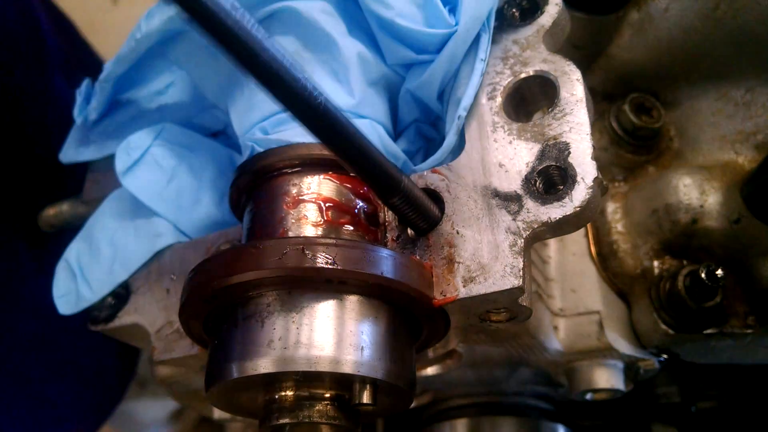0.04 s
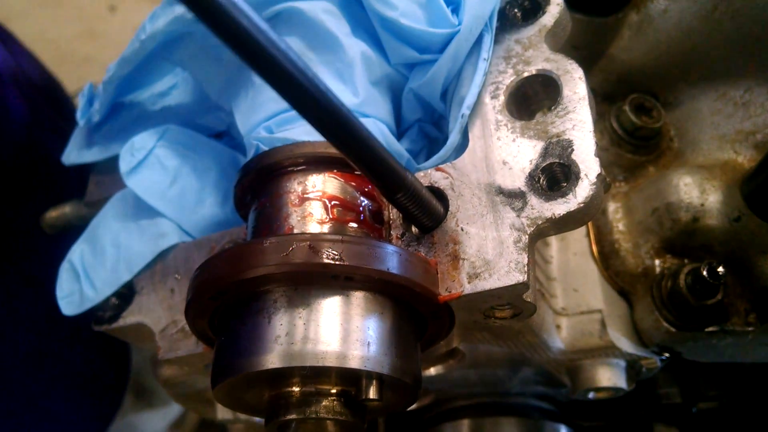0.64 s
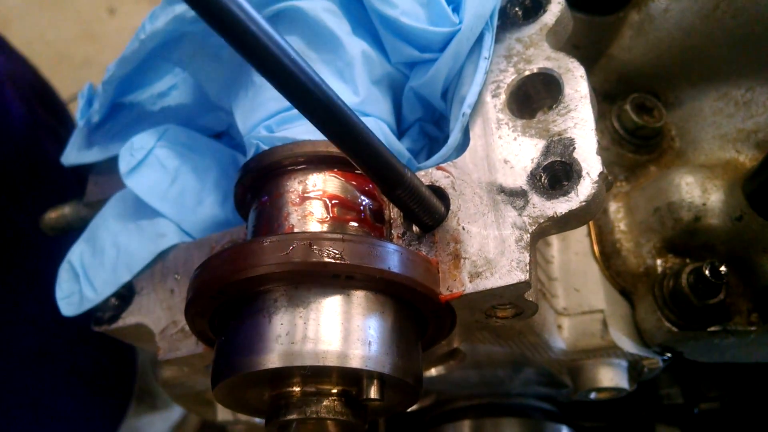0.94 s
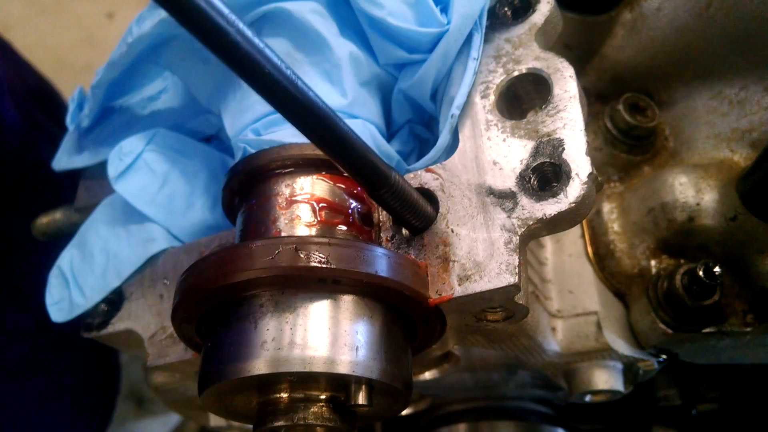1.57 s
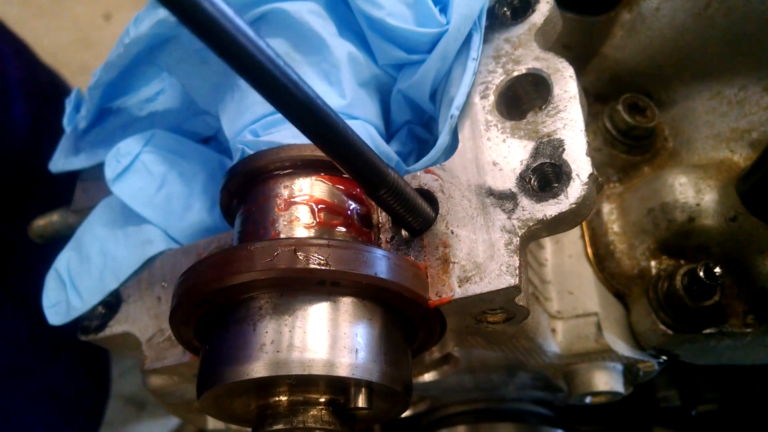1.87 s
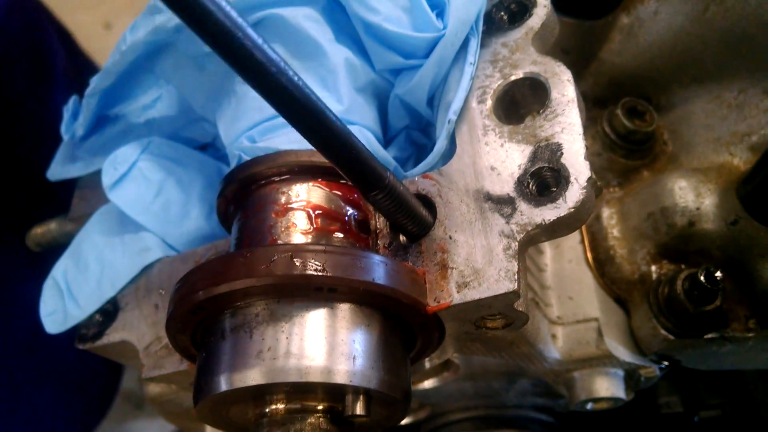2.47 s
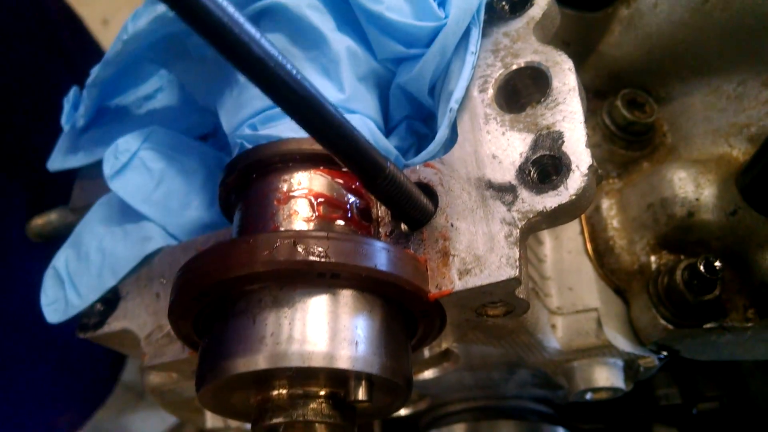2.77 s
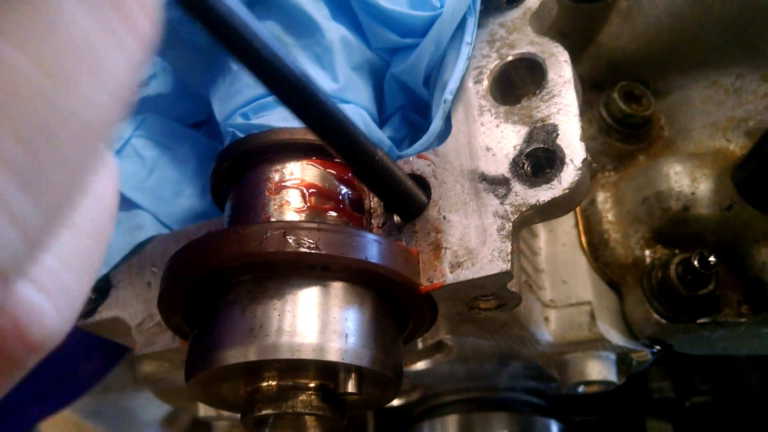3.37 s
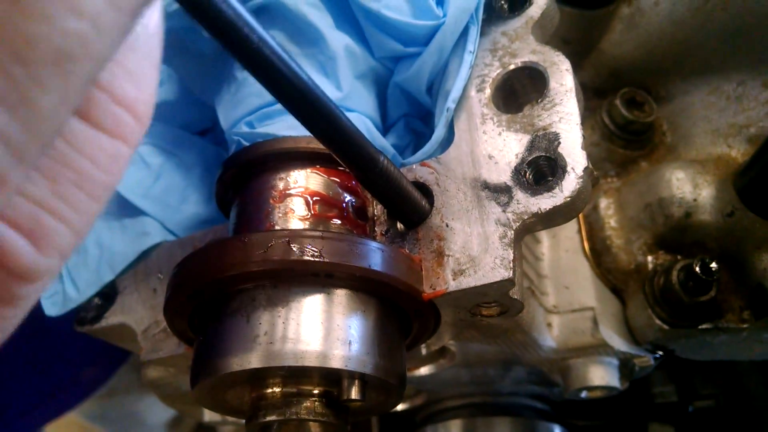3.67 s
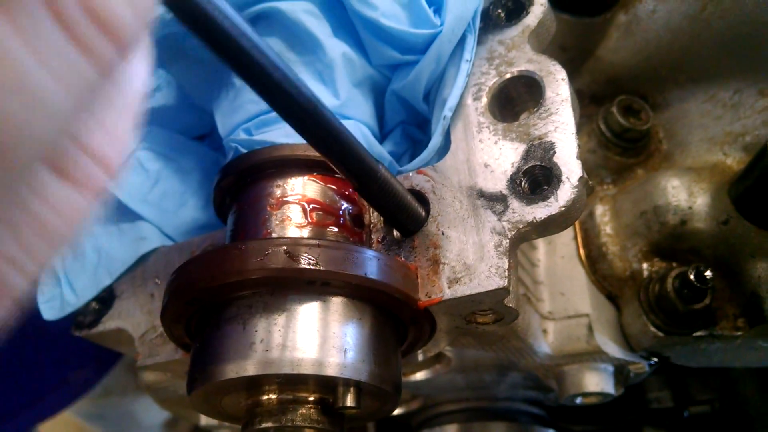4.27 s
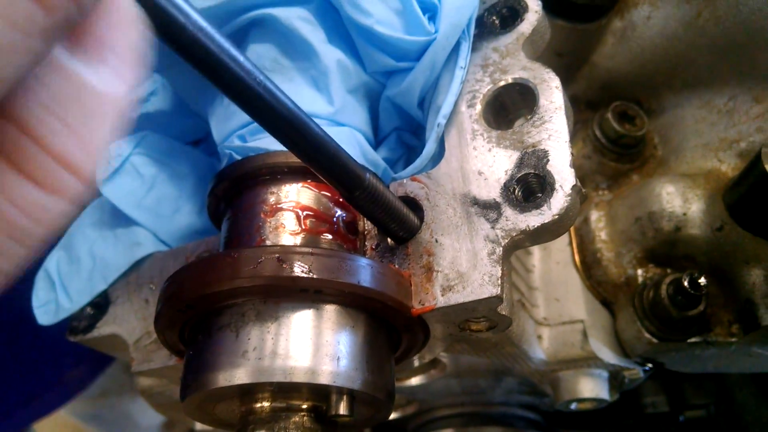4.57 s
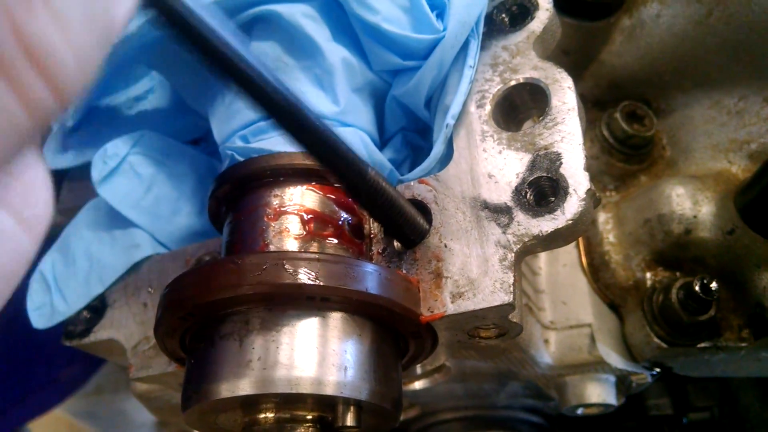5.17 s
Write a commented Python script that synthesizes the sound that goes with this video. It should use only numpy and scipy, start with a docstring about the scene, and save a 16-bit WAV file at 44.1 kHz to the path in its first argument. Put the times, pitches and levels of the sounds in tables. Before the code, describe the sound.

A long steel tool is spun by hand in a threaded hole of an engine part. Its shaft knocks against the metal in light, bright clicks, singly or in quick clusters, each with a very short ring. Faint rubbing, scraping and thin squeaks come with each twist, and the sharpest click falls near the end. The sound is close and nearly dry, with a few soft finger bumps on the microphone and a low workshop hum behind.

```python
"""A long steel tool, spun by hand in a threaded hole of an engine part, close to a camera's microphone.
The shaft knocks against the hole in light, bright clicks that ring the tip, the shaft and the casting;
with each twist of the fingers it rubs, scrapes and faintly squeaks. Fingers bump the camera now and then,
and farther off the workshop hums. The recorder ducks after the hardest click and widens the stereo."""
import sys
import numpy as np
from scipy import signal
from scipy.fft import rfft, irfft
from scipy.io import wavfile
from scipy.ndimage import uniform_filter1d, minimum_filter1d

SR = 44100
rng = np.random.default_rng(int(sys.argv[2]) if len(sys.argv) > 2 else 0)


def store_pcm(level_fs):
    """Save levels as 16-bit WAV."""
    pcm = np.round(np.clip(level_fs, -1, 1) * 32767).astype(np.int16)
    wavfile.write(sys.argv[1], SR, np.atleast_2d(pcm).T)


N = 234567
FILTER_HZ = np.fft.rfftfreq(2048, 1 / SR)


def amp(db):
    """Decibels to gain."""
    return 10 ** (np.asarray(db) / 20)


def unit_rms(x):
    """Scales to rms 1."""
    return x / np.sqrt(np.mean(x ** 2) + 1e-30)


def unit_burst(x, over_s=.0056):
    """Scales a short stereo sound to the energy of rms 1 held for over_s."""
    return x / np.sqrt(np.sum(x ** 2) / (2 * over_s * SR) + 1e-30)


def at_hz(points, hz):
    """Reads a spectrum on a log-frequency axis."""
    f, value = np.transpose(points)
    return np.interp(np.log(hz + 1), np.log(f + 1), value)


def curve(rows, column):
    """One column of a timed table at every sample."""
    rows = np.asarray(rows)
    return np.interp(np.arange(N) / SR, rows[:, 0], rows[:, column])


def with_peaks(points, modes):
    """A spectrum plus narrow resonances, in dB at FILTER_HZ."""
    peaks_db = sum(db / (1 + (2 * (FILTER_HZ - f) / width) ** 2) for f, width, db in modes)
    return at_hz(points, FILTER_HZ) + peaks_db


def bell(centre_hz, hz, octaves):
    """A bell of height 1 on a log-frequency axis."""
    return np.exp(-(np.log2((hz + 1) / centre_hz) / octaves) ** 2)


def response(points):
    """Causal impulse response with the given spectrum."""
    log_gain = np.log(amp(at_hz(points, abs(np.fft.fftfreq(2048, 1 / SR)))))
    return np.fft.ifft(np.exp(np.conj(signal.hilbert(log_gain)))).real[:1024]


def through(x, taps):
    """Filters both channels."""
    return signal.fftconvolve(x, taps[None], axes=1)[:, :x.shape[1]]


def add(mix, s, sound):
    """Mixes a sound in at time s."""
    part = mix[:, max(0, round(s * SR)):][:, :sound.shape[1]]
    part += sound[:, :part.shape[1]]


def wander(hz):
    """Random drift of rms 1, up to the given rate."""
    f = np.fft.rfftfreq(N, 1 / SR)
    return unit_rms(irfft(rfft(rng.standard_normal(N)) / (1 + (f / hz) ** 4), N))


def pan(left_db):
    """Gains that favour the left channel."""
    return amp([[left_db / 2], [-left_db / 2]])


def port_noise(n, likeness):
    """Noise at the two microphone ports, partly shared."""
    shared = np.sqrt(likeness) * rng.standard_normal(n)
    return shared + np.sqrt(1 - likeness) * rng.standard_normal((2, n))


# workshop air and microphone hiss: spectrum (f/Hz, level/dB) and course (t/s, level/dB)
AIR_SPECTRUM = [(20, 9), (60, 8), (140, 2), (370, -4), (455, -2), (560, -7), (800, -12.5), (1200, -12),
                (1650, -18), (2000, -14.5), (2300, -19.5), (5000, -18.5), (15400, -22), (15700, -58)]
AIR_LEVEL = [(0, -52), (2.8, -51.5), (3.8, -54.5), (5.3, -54)]
# how alike distant sound is at the two ports (f/Hz, likeness/0-1)
PORT_LIKENESS = [(20, 0.56), (200, 0.57), (500, 0.49), (1200, 0.32), (2200, 0), (16000, 0.07)]
# machinery in the background, stepping up in pitch once (t/s, f/Hz, level/dB)
MACHINE_HUM = [(0, 81, -54), (3.85, 81.5, -56), (4.1, 96, -54), (4.7, 96, -51.5), (5.3, 96.3, -48)]


def workshop(drift_hz=0.54, waver_db=3.5, overtone_db=-12):
    """Behind the work: room noise, microphone hiss and, to the left, a wavering machine hum."""
    hz = np.fft.rfftfreq(N, 1 / SR)
    left, apart = rfft(rng.standard_normal((2, N)))
    likeness = at_hz(PORT_LIKENESS, hz)
    right = likeness * left + np.sqrt(1 - likeness ** 2) * apart
    air = unit_rms(irfft(np.array([left, right]) * amp(at_hz(AIR_SPECTRUM, hz)), N))
    phase = 2 * np.pi * np.cumsum(curve(MACHINE_HUM, column=1) + drift_hz * wander(hz=4.1)) / SR
    hum = np.sin(phase) + amp(overtone_db) * np.sin(2 * phase)
    hum *= amp(curve(MACHINE_HUM, column=2) + waver_db * wander(hz=15))
    return air * amp(curve(AIR_LEVEL, column=1)) * pan(left_db=1.5) + hum * np.array([[1], [.25]])


def room_tail(x, low_t60=0.65, high_t60=0.065, treble_db=-31):
    """The workshop returns a diffuse tail, shorter and weaker in the treble."""
    t = np.arange(SR // 3) / SR
    noise = rng.standard_normal((2, len(t))) * np.minimum(t / 0.01, 1)
    low = signal.sosfilt(signal.butter(2, 2800, fs=SR, output="sos"), noise)
    tail = low * amp(-60 * t / low_t60) + noise * amp(treble_db - 60 * t / high_t60)
    return signal.fftconvolve(x, tail / np.linalg.norm(tail[0]), axes=1)[:, :N]


# handling noise, right at the microphone (t/s, peak level/dB, f/Hz)
FINGER_BUMPS = [(0.056, -37, 165), (1.241, -22.5, 223), (1.737, -32.5, 86), (1.7683, -34, 324),
                (2.988, -30.5, 60), (3.044, -35.5, 302), (3.067, -32, 165), (3.081, -31.5, 272),
                (3.093, -40, 200), (3.3, -33.5, 80), (3.586, -36, 73.6), (3.7, -29, 290),
                (3.958, -26.5, 71), (4.351, -29, 76.4), (5.103, -30.5, 78)]


def finger_bumps(width_cycles=0.37, right_share=0.013):
    """A finger pushes the camera body and lets go: one soft swing, mostly at the left port."""
    out, t = np.zeros((2, N)), np.arange(-SR // 25, SR // 25) / SR
    for start, db, hz in FINGER_BUMPS:
        u = t * hz / width_cycles
        swing = -2 * u * np.exp(.5 - 2 * u ** 2)
        add(out, start + t[0], amp(db) * swing * np.array([[1], [right_share]]))
    return out


# twists of the fingers (t/s, length/s, hiss level/dB, squeak level/dB, grind level/dB)
FINGER_TWISTS = [(0.01, 0.19, -51, -56, -55.5), (0.449, 0.16, -57.5, -65, -61), (0.563, 0.3, -56, -62, -72),
                 (0.624, 0.14, -80, -57, -80), (0.823, 0.094, -82, -75, -59.5),
                 (1.006, 0.048, -53.5, -67, -56.5), (1.177, 0.14, -49.5, -56, -52.5),
                 (1.29, 0.066, -58, -67, -76), (1.727, 0.15, -50, -57, -56.5),
                 (1.927, 0.083, -85, -77, -55.5), (2.238, 0.22, -51, -56, -60.5),
                 (2.507, 0.41, -68, -73, -67), (2.998, 0.2, -52, -64, -58.5), (3.331, 0.1, -43, -57, -46.5),
                 (3.425, 0.052, -51.5, -61, -58), (3.538, 0.072, -62, -76, -55.5),
                 (3.608, 0.21, -46.5, -59, -61), (3.946, 0.08, -59, -64, -71),
                 (3.992, 0.094, -45, -53, -69), (4.16, 0.028, -53.5, -62, -63),
                 (4.182, 0.052, -63, -58, -64), (4.217, 0.13, -60.5, -62, -80),
                 (4.356, 0.2, -50, -56, -54.5), (4.67, 0.18, -61, -68, -68), (4.954, 0.075, -62, -66, -88),
                 (5.12, 0.2, -52.5, -67, -55.5)]


def twist_gains(resting_db=(-63.5, -77, -84.5), peak_share=0.35, sharpness=1.32):
    """Gains of hiss, squeak and grind: in each twist the pressure swells and eases in one arch."""
    gains = amp(resting_db)[:, None] * np.ones(N)
    for start, length, *levels_db in FINGER_TWISTS:
        progress = np.arange(0, length, 1 / SR) / length
        swell = np.interp(progress, [0, peak_share, 1], [0, 1, 0])
        add(gains, start, amp(levels_db)[:, None] * np.sin(np.pi / 2 * swell) ** sharpness)
    return gains


def friction(spectrum, slips_per_s, grit, likeness):
    """Tiny slips of uneven size over a smooth slide, coloured by what they shake."""
    slips = (rng.random(N) < slips_per_s / SR) * amp(4 * np.minimum(rng.exponential(1, N), 3))
    drive = port_noise(N, likeness) * (1 + grit * unit_rms(slips))
    return unit_rms(through(drive, response(spectrum)))


# three colours of steel rubbing in the thread, heard close (f/Hz, level/dB)
HISS_SPECTRUM = [(1000, -38), (3000, -1), (4600, -1), (6500, 1), (9000, 3), (11000, 5), (12800, 8),
                 (14800, 5.5), (15450, 16), (15700, -30)]
SQUEAK_SPECTRUM = [(12000, -21), (13300, 27), (13750, 23), (14050, 37), (14400, 7), (14750, 15),
                   (15200, -9)]
GRIND_SPECTRUM = [(100, 10.5), (300, 5.5), (560, 1), (720, 3), (930, -4.5), (1300, 0.5), (1700, -1.5),
                  (2030, 7), (2300, -16), (2750, 0), (3100, -2.5), (5000, -25.5)]
# shaft resonances that sliding excites (f/Hz, width/Hz, level over the hiss/dB)
SLIDING_MODES = [(2980, 44, 7), (5680, 120, 10.5), (7320, 330, 11), (12050, 110, 8)]


def shaft_rubbing(flutter_db=-1.5, catch_db=3, tremble_db=1.5):
    """Close by, a little left, the turning shaft slides, squeaks and grinds under a trembling pressure."""
    sliding, squeaking, grinding = twist_gains()
    hiss_colour = np.c_[FILTER_HZ, with_peaks(HISS_SPECTRUM, SLIDING_MODES)]
    hiss = sliding * friction(hiss_colour, slips_per_s=1800, grit=0.4, likeness=0.05)
    squeak = amp(3) * squeaking * friction(SQUEAK_SPECTRUM, slips_per_s=2540, grit=0.44, likeness=0.11)
    grind = grinding * friction(GRIND_SPECTRUM, slips_per_s=800, grit=.6, likeness=.35)
    squeak *= amp(flutter_db * wander(hz=42))
    grind *= amp(catch_db * wander(hz=35))  # the thread catches and slips
    return (hiss + squeak + grind) * amp(tremble_db * wander(hz=77)) * pan(left_db=2.5)


# modes of the engine casting, struck or scraped (f/Hz, level/dB, t60/s)
CASTING_MODES = [(424, -32, 0.23), (452.5, -12.5, 0.16), (510, -15.5, 0.13), (630, -13.5, 0.057),
                 (670, -27.5, 0.064), (745, -20.5, 0.078), (1153, -18.5, 0.047), (1239, -22.5, 0.16),
                 (1330, -20, 0.15), (1494, -20, 0.096), (1564, -21.5, 0.15), (1640, -19, 0.12),
                 (1903, -11.5, 0.067), (2164, -17, 0.1), (2376, -13, 0.14), (2750, -7, 0.075),
                 (3435, -10.5, 0.024), (3955, -11.5, 0.017)]
DEEP_HZ, SPOT_OCTAVES = 800, .13  # top of the deep modes; width of the region a contact spot favours


def casting_ring(t, spot_hz, deep_db, decay_scale, favour_db=10, spread_rad=1.58, build_s=0.0015):
    """The struck casting rings; every contact lands elsewhere, so it weights the modes differently."""
    hz, mode_db, t60 = np.transpose(CASTING_MODES)[:, :, None]
    weight, detune, turn, skew = rng.standard_normal((4, len(hz), 1))
    phase = 2 * np.pi * (hz * (1 + 0.0097 * detune) * t + turn)
    spot_db = favour_db * bell(spot_hz, hz, SPOT_OCTAVES) + 2 * weight
    envelope = amp(mode_db + spot_db - 60 * t / (t60 * decay_scale)) * (1 - np.exp(-t / build_s))
    modes = envelope * np.sin([phase + side * spread_rad * skew for side in (-.5, .5)])
    gain = np.linalg.norm(unit_burst(modes.sum(1))) / np.linalg.norm(modes)
    return gain * np.sum(modes * amp(deep_db * (hz < DEEP_HZ)), 1)


# the shaft judders along the wall of the hole (t/s, length/s, level/dB, favoured f/Hz, its boost/dB)
WALL_SCRAPES = [(1.795, 0.053, -54.5, 1500, 8), (1.848, 0.064, -60, 1560, 9), (3.105, 0.055, -58, 1230, 15),
                (3.357, 0.012, -39.5, 680, 19), (3.376, 0.016, -45.5, 1280, -1),
                (3.68, 0.083, -47, 1180, 4), (3.719, 0.058, -50.5, 1470, -15),
                (3.765, 0.027, -53, 2100, -3), (4.025, 0.059, -59, 1500, 10.5),
                (5.166, 0.025, -50, 1170, 13), (5.196, 0.015, -50.5, 1240, 12),
                (5.23, 0.021, -43, 1470, 12.5)]


def wall_scrapes(slips_per_s=450, decay_scale=0.44, deep_db=-9, attack_s=0.0012, fade_db=-9):
    """Close by, a little right, quick uneven slips ring the casting, which the pressing shaft damps."""
    out, t = np.zeros((2, N)), np.arange(SR // 8) / SR
    hz, mode_db, t60 = np.transpose(CASTING_MODES)[:, :, None]
    for start, length, db, spot_hz, boost_db in WALL_SCRAPES:
        travel = np.cumsum(rng.exponential(1, len(t)) ** 3) / 6 * slips_per_s / SR
        slips = np.diff(np.floor(travel), prepend=-1) > 0
        push = np.minimum(t / attack_s, 1) * amp(fade_db * t / length) * (t < length)
        phase = 2 * np.pi * (hz * t + rng.random((len(hz), 1)))
        spot_db = deep_db * (hz < DEEP_HZ) + boost_db * bell(spot_hz, hz, SPOT_OCTAVES)
        ring = np.sum(amp(mode_db + spot_db - 60 * t / (t60 * decay_scale)) * np.sin(phase), 0)
        scrape = through(port_noise(len(t), likeness=0.36) * slips * push, ring)
        add(out, start, amp(db) * unit_burst(scrape, length) * pan(left_db=-2))
    return out


# dull response of the casting (f/Hz, level/dB)
KNOCK_SPECTRUM = [(60, -9), (160, 3.5), (300, -2.5), (500, -5), (900, -6), (1350, -2.5), (1750, -6),
                  (2100, 1), (2700, 2), (3700, -17), (5000, 1), (8000, -25)]


def casting_knock(rise, since_contact, t60=0.046):
    """A contact shakes the whole casting in a short, dull burst."""
    drive = port_noise(len(rise), likeness=0.33) * rise * amp(-60 * since_contact / t60)
    return unit_burst(through(drive, response(KNOCK_SPECTRUM)))


def shaft_ping(t, hz, decay_scale, swell_s=0.0044, t60=0.03, glow_db=-32, glow_t60=0.058):
    """The shaft bends in two planes: its ring swells, dies quickly and leaves a faint afterglow."""
    decay = amp(-60 * t / t60) + amp(glow_db - 60 * t / (glow_t60 * decay_scale))
    envelope = (1 - np.exp(-t / swell_s)) * decay
    # the moving contact shakes the phase
    smear_rad = 0.34 * unit_rms(uniform_filter1d(rng.standard_normal(len(t)), size=128))
    phase = 2 * np.pi * hz * t + smear_rad + np.array([[-0.12], [0.12]])
    plane_ratio = 1.052 + .015 * rng.standard_normal()  # varies with the grip
    second_plane = amp(-8) * np.sin(plane_ratio * phase + 2 * np.pi * rng.random())
    return unit_burst((np.sin(phase) + second_plane) * envelope)


# bright response of the steel tip (f/Hz, level/dB) and its resonances (f/Hz, width/Hz, boost/dB)
TIP_SPECTRUM = [(1000, -17), (2900, -6.5), (4000, -6.5), (4950, -7.5), (5300, 7), (6300, 6), (7500, 4.5),
                (8600, 2), (10000, 6.5), (10600, 3), (11300, 11.5), (12700, 4), (13600, 6.5),
                (16500, -13.5)]
TIP_RESONANCES = [(6210, 750, 2), (7630, 110, 10), (8950, 660, -1.5), (11900, 430, 1.5)]


def tip_tick(chatter, spot_hz, bright_db, left_db, favour_db=7.5, lag_s=.00022):
    """The tip ticks, coloured by the spot that is struck; the sound reaches the left port first."""
    spot_db = favour_db * bell(spot_hz, FILTER_HZ, octaves=0.18)
    tilt_db = (bright_db - 2.5) * np.clip(np.log2((FILTER_HZ + 1) / 9500), -.6, .6)
    colour = np.c_[FILTER_HZ, with_peaks(TIP_SPECTRUM, TIP_RESONANCES) + spot_db + tilt_db]
    tick = unit_burst(through(chatter, response(colour))) * pan(left_db)
    tick[1] = np.r_[np.zeros(round(lag_s * SR)), tick[1]][:tick.shape[1]]
    return tick


def top_ring(t, chatter, hz=15330, t60=.007):
    """The highest ring is so short a wave that the ports hear it in opposite phase."""
    ring = np.sin(2 * np.pi * hz * t) * amp(-60 * t / t60)
    return unit_burst(through(np.array([chatter[0], -chatter[0]]), ring))


# the shaft meets the wall of the hole, close to the microphone (t/s, level/dB, extra body/dB,
# brightness/dB, top ring/dB, tick left over right/dB, shaft f/Hz, extra shaft ring/dB,
# extra deep ring/dB, favoured tip f/Hz, favoured casting f/Hz)
SHAFT_CLICKS = [(0.01, -48, -25, 5, -23, 3, 1970, -9, 0, 6260, 1330),
                (0.036, -24, 2.5, 5.5, 2, 1, 1970, -5.5, -7, 6200, 510),
                (0.06, -44.5, 2, -14, -20, 2, 1990, -9, 3, 6100, 510),
                (0.0922, -25.5, 4.5, -11, -30, 1, 2120, -10, 5.5, 6100, 1530),
                (0.1085, -22.5, -5.5, -3.5, -11, 7.5, 2040, 3.5, -4, 8560, 520),
                (0.2204, -51.5, -1.5, -5, -6, 1, 1960, -22, 9, 8950, 1530),
                (0.473, -33, 7, -5, 3, 8.5, 1954, -2, -10, 9200, 443),
                (0.488, -45.5, -0.5, -14, -10, 1, 1900, -19, 5, 11200, 1240),
                (0.516, -40, 2, -5, -19, -6, 2046, -1, -4, 3900, 1320),
                (0.8421, -53, 0.5, -4, -15, 4, 2070, -6, -8, 7400, 1330),
                (0.8694, -51, 5, -4, -13, -3, 1980, -9, -5, 4900, 446),
                (0.986, -53.5, 3, -8, -13, -1, 1995, -0.5, 1, 13800, 1330),
                (1.079, -57, -3.5, -22, -18, 7, 2010, -12, 5, 4900, 1170),
                (1.1722, -42.5, 1, -12, -5, -9, 2030, -1.5, -14, 11200, 1320),
                (1.245, -43.5, 3.5, -10, -20, 4, 2110, 0, 7, 9000, 506),
                (1.2574, -23.5, 0, 0, -22, 5.5, 2027, 5, 0, 9400, 1350),
                (1.7205, -45, 4.5, -12, -19, -2, 2080, -15, 3.5, 11500, 1330),
                (1.7903, -42, 9.5, 3, -15, 4, 1960, -10, -4, 3900, 490),
                (1.796, -35.5, -19, -4, -14, 0, 2050, -9, -4, 8950, 1330),
                (1.842, -31.5, 1.5, -13, -16, 2, 2060, -5, -2, 4000, 1570),
                (1.849, -46, 6.5, -16, -12, 0, 2050, -4, 6, 11200, 1580),
                (2.2579, -41, -0.5, -12, -9, -6, 2010, -3.5, 6, 3040, 1170),
                (2.264, -43, -9, -3, -1, 11, 2050, -3, 11, 9000, 450),
                (2.3042, -19, -2, -0.5, -6, -1, 2090, 3, 3.5, 9200, 2300),
                (2.318, -49, 0, -2, -12, -22, 2070, 7, -10, 9000, 2200),
                (2.3507, -37, -12, -4, -14, 7, 2060, 9, -5, 5200, 1550),
                (2.3545, -38, -14, -5, -14, 1, 2030, -5, -2, 6200, 1550),
                (2.3563, -48, 0, -6, -14, -8, 2018, 12, 0, 6100, 1550),
                (2.3686, -20, -2, 1, -7, -1, 2070, -0.5, -4, 8600, 1320),
                (2.3897, -40.5, 3.5, -16, -11, -5, 2090, -11, -16, 3870, 1330),
                (2.5929, -35, 6.5, 3, -14, 5, 2000, -8.5, 2, 3900, 477),
                (2.7094, -49, 7, 0, -13.5, 4, 1980, -12, -2.5, 3860, 710),
                (3.097, -63, -4.5, -4, -14, 1, 2036, 11, 5, 6100, 1240),
                (3.122, -49, 4, 3, -16, 6, 2005, -6, 8.5, 13800, 1330),
                (3.3505, -46, 5, -11, -12, 16, 2010, -10, 4, 7400, 724),
                (3.3609, -52, 8, -4, -12, 5, 1967, 4, 5, 7400, 680),
                (3.6794, -37.5, 7, 12, -12, -4, 2040, -14, -3.5, 3700, 1100),
                (3.719, -20, 2, 3, -7, -1, 2095, -0.5, -15, 6130, 1520),
                (3.729, -32.5, 0, -3, -10, 4, 2050, 3, -10, 13800, 1360),
                (3.763, -43.5, 5.5, -20, -13, 4, 2030, -7, -4, 3530, 1290),
                (4.4493, -47.5, 5, -10, 3, 35, 1980, -4, 3, 7550, 1150),
                (4.455, -12, 2.5, 5, 0, 10.5, 2030, -2.5, -13, 4780, 1880),
                (4.466, -36, 7, -8, -10, -2, 1930, -10, -2, 3730, 520),
                (4.7107, -47, 3, -9, -4, 13, 1850, -18, -13, 3070, 1170),
                (4.755, -62, 4, 3, -17.5, -7, 1960, -10, -2, 3900, 1550),
                (5.178, -50, 6.5, -3, -10, 6, 1930, -12, -11, 7450, 1170),
                (5.2308, -36, 5.5, -1.5, -13, 3, 1876, -8, 3.5, 13800, 1450)]


def shaft_clicks(light_db=-44.5, hard_db=-19, chatter_t60=0.013, after_db=-27, after_t60=0.072):
    """Each contact snaps and chatters, shaking tip, shaft and casting; a harder one is shorter."""
    out, t = np.zeros((2, N)), np.arange(SR // 8) / SR
    for (start, db, body_db, bright_db, top_db, left_db,
         shaft_hz, shaft_db, deep_db, tip_hz, casting_hz) in SHAFT_CLICKS:
        force_db = min(db, hard_db) - light_db
        contact_s = 0.0017 * .5 ** (force_db / 10.5)
        rise = np.minimum(t / (0.43 * contact_s), 1)
        since_contact = np.maximum(t - contact_s, 0)
        decay = amp(-60 * since_contact / chatter_t60) + amp(after_db - 60 * since_contact / after_t60)
        chatter = port_noise(len(t), likeness=0.13) * rise * decay
        snap = 5.3 * amp(0.6 * max(db - hard_db, 0))
        chatter[:, round(contact_s * SR / 2)] += snap
        tick = tip_tick(chatter, tip_hz, bright_db, left_db) + amp(top_db - 1) * top_ring(t, chatter)
        decay_scale = amp(0.09 * min(db + 33, 0))  # a light touch leaves the shaft on the wall, damped
        body = amp(-5) * casting_knock(rise, since_contact)
        body += amp(shaft_db - 2) * shaft_ping(t, shaft_hz, decay_scale)
        body += amp(-6) * casting_ring(t, casting_hz, deep_db, decay_scale)
        body *= amp(body_db - 0.67 * force_db)  # a harder click is more tick than knock
        add(out, start - .0003, amp(db) * (tick + body))
    return out


def scene(room_db=-25):
    """At the camera: the tool close and nearly dry, fingers on the housing, the workshop behind."""
    tool = shaft_clicks() + wall_scrapes() + shaft_rubbing()
    return tool + amp(room_db) * room_tail(tool) + finger_bumps() + workshop()


def gain_control(x, threshold_db=-16.5, hold_s=0.054, recover_s=0.29):
    """The recorder turns down at once whatever passes the threshold, holds, then recovers slowly."""
    t = np.arange(N) / SR
    power_db = 10 * np.log10(abs(uniform_filter1d(np.mean(x ** 2, 0), size=256)) + 1e-12)
    over_db = np.maximum(power_db - threshold_db, 0)
    cut_db = np.maximum.accumulate(over_db * np.exp(t / recover_s)) * np.exp(-t / recover_s)
    half_hold = round(hold_s * SR / 2)
    held_db = minimum_filter1d(-cut_db, 2 * half_hold + 1, origin=half_hold)
    return x * amp(uniform_filter1d(held_db, size=32))


# the recorder's stereo widening (f/Hz, share subtracted from the left/0-1, from the right/0-1)
WIDENING = [(20.4, 1, 0.46), (1200, 0.45, 0.63), (2550, 0.38, 0.99), (4030, 0.32, 1), (5400, 0.59, 0.55),
            (6400, 0.99, 0.041), (9700, 0.51, 0.014), (12900, 1, 0.032), (16700, 0.66, 0.05)]
WIDENING_DELAY_S, BAND_LIMIT_HZ = 0.0003912, 16500


def record(dry):
    """In the camera: gain control, widening by subtracting the delayed opposite channel, a band limit."""
    hz, spectrum = np.fft.rfftfreq(N, 1 / SR), rfft(gain_control(dry))
    f, *shares = np.transpose(WIDENING)
    share = np.clip([at_hz(np.c_[f, side], hz) for side in shares], 0, .9)
    opposite = np.exp(-2j * np.pi * hz * WIDENING_DELAY_S) * spectrum[::-1]
    wide = irfft((spectrum - share * opposite) / np.sqrt(1 + share ** 2), N)
    lowpass = signal.firwin(255, BAND_LIMIT_HZ, window=("kaiser", 9), fs=SR)
    return signal.oaconvolve(wide, lowpass[None], "same", axes=1)


dry = scene()
out = record(dry)
store_pcm(out)
```